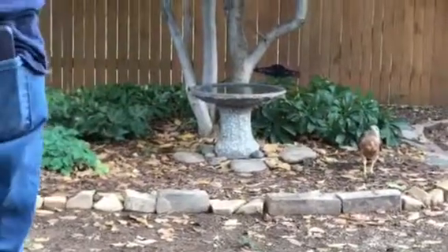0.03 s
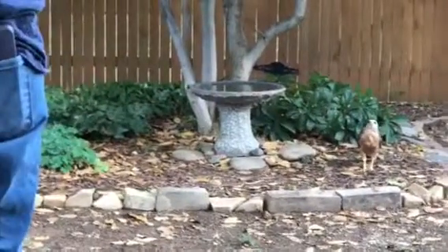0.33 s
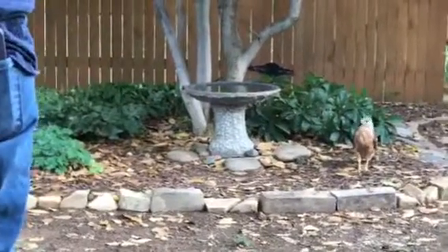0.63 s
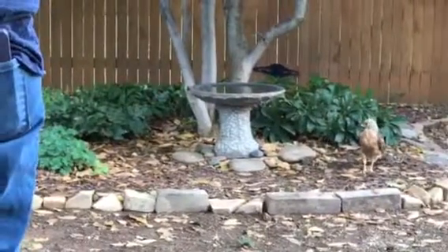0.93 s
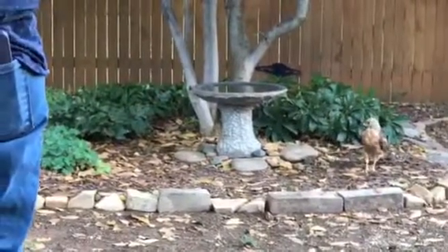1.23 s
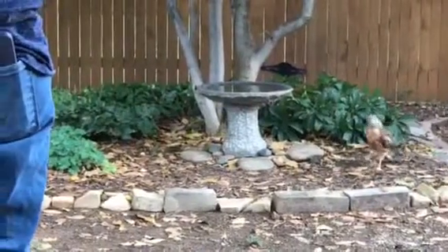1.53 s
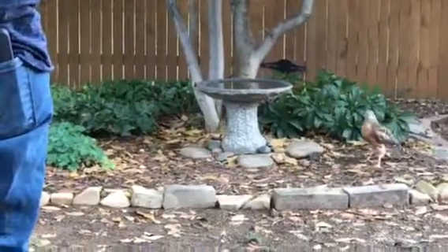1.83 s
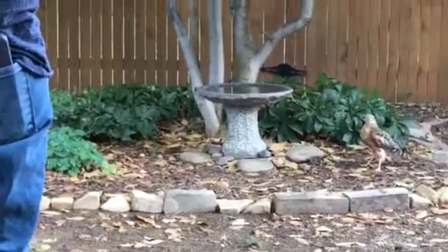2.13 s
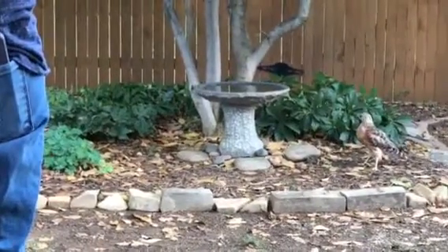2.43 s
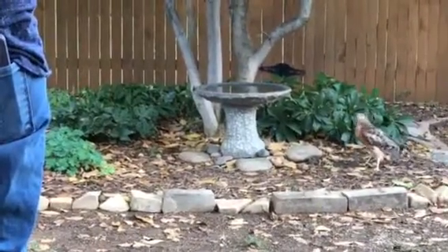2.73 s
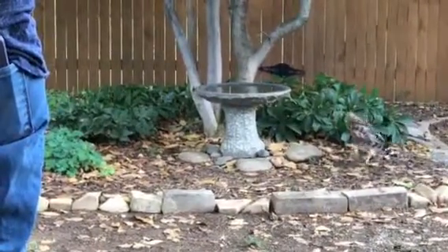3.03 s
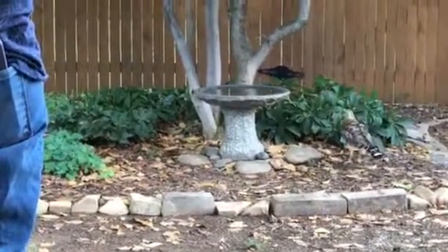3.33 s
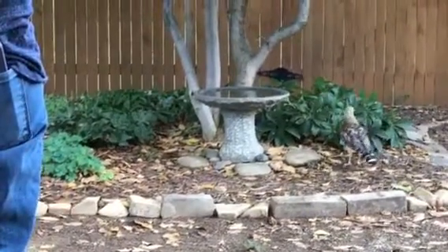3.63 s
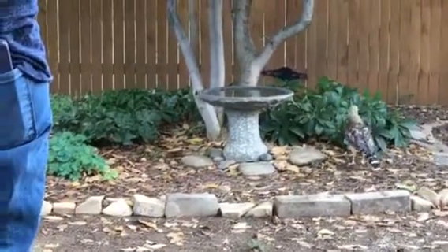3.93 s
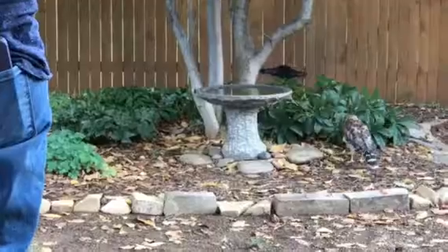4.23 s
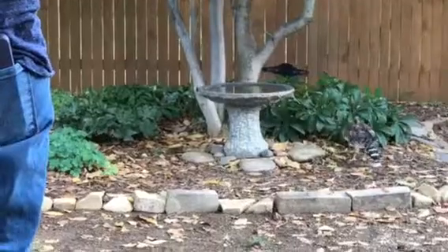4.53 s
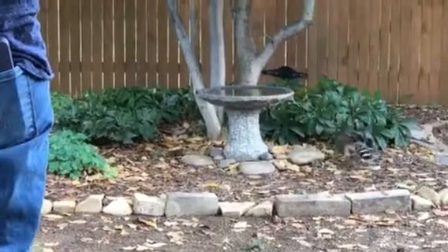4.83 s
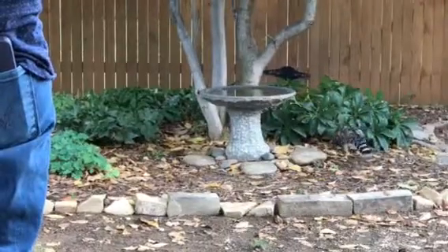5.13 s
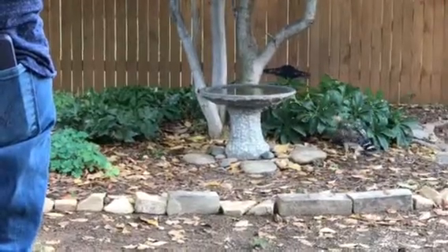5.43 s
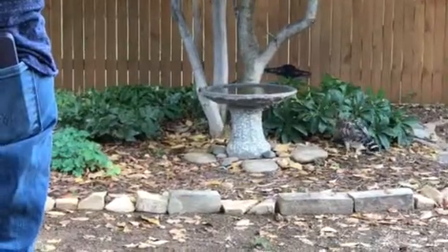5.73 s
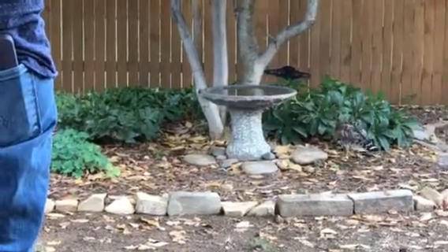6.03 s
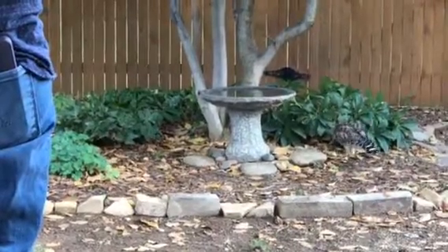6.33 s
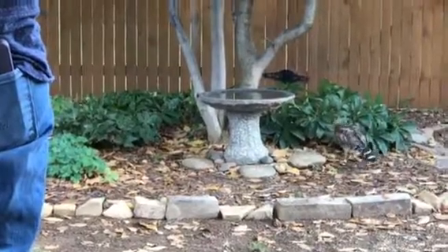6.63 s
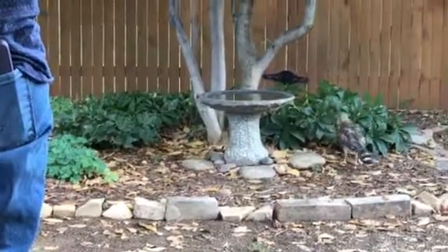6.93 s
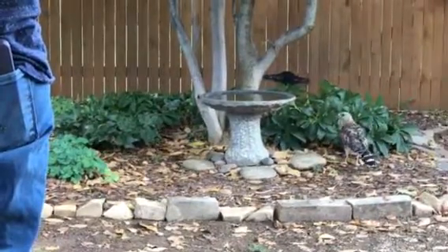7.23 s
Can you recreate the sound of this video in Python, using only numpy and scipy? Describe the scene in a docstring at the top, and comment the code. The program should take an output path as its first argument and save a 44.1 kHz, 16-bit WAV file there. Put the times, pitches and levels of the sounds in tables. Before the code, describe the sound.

A faint, low traffic rumble and a machine hum run throughout in a fenced back yard. A hawk, fairly near, gives a sharp, high chirp at 0.2 seconds, another at 1.7 and a quick pair around 1.9, followed by soft clucks. Dry leaves crackle briefly at 2.7 seconds. Two loud, harsh, nasal screams follow at 2.8 and 3.4 seconds, each about a third of a second long, dropping in pitch and breaking into a chirp. Chirp pairs come at 4.7 and 5.3 seconds. From 5.5 seconds to the end, small metal chimes tinkle faintly, very high. At 6.6 seconds a chirp opens a third, hoarser scream that cracks into squeaky notes. A small distant bird peeps softly now and then, with tiny leaf rustles and two quiet rising whines near 1.4 and 6.1 seconds. The calls carry a short, light echo.

```python
"""A sharp two-voiced chirp cuts through the low traffic rumble and machine hum of a fenced back yard.
More chirps follow, two unrelated notes from the two sides of a bird's syrinx, along with three harsh,
nasal screams whose harmonics ring in the throat until the voice breaks. Soft whines, clucks, far peeps
and dry leaf rustles fall in between; late on, small hanging metal rods knock together and tinkle faintly.
The fence, the house and the trees echo the calls, rustles and tinkles."""
import sys
import numpy as np
from scipy import signal
from scipy.fft import rfft, irfft
from scipy.io import wavfile

SR = 44100
rng = np.random.default_rng(int(sys.argv[2]) if len(sys.argv) > 2 else 0)


def output_pcm(signal):
    """Save a mono or channel-first signal as 16-bit PCM at the path in sys.argv[1].

    Samples are clipped to [-1, 1] before scaling.
    """
    pcm = np.clip(np.atleast_2d(signal).T, -1, 1) * 32767
    wavfile.write(sys.argv[1], SR, np.round(pcm).astype(np.int16))


N = 321048


def undb(db):
    """Decibels to gain."""
    return 10 ** (np.asarray(db) / 20)


def unit(x):
    """Scale to rms 1."""
    return x / np.sqrt(np.mean(x ** 2) + 1e-18)


def at_hz(points, hz):
    """Read (Hz, value) points on a log-frequency axis."""
    freqs, values = np.transpose(points)
    return np.interp(np.log(np.maximum(hz, 1)), np.log(freqs), values)


def colour(x, points):
    """EQ by a curve of (Hz, dB) points."""
    return irfft(rfft(x) * undb(at_hz(points, np.fft.rfftfreq(len(x), 1 / SR))), len(x))


def band(x, lo_hz, hi_hz):
    """Causal band-pass."""
    sos = signal.butter(2, [lo_hz, min(hi_hz, SR / 2 - 100)], "band", fs=SR, output="sos")
    return signal.sosfilt(sos, x)


def wobble(n, rate):
    """Random modulator with `rate` turns a second and a spread near 1."""
    return np.interp(np.arange(n) / SR * rate, np.arange(n), rng.standard_normal(n))


def phase_of(hz):
    """Running phase of a pitch curve."""
    return 2 * np.pi * np.cumsum(hz) / SR


def fade(t, length, rise, fall):
    """Smooth gate from 0 to `length`."""
    return np.sin(np.pi / 2 * np.clip(np.minimum(t / rise, (length - t) / fall), 0, 1)) ** 2


def add(track, start, x):
    """Mix a sound into a track at `start` seconds."""
    i = max(int(start * SR), 0)
    track[i:i + len(x)] += x[:max(N - i, 0)]


# traffic bed before its final EQ: (frequency [Hz], relative level [dB])
TRAFFIC_SPECTRUM = [(15, -25), (25, -26), (55, -4), (84, -4), (123, -0.5), (194, -13), (241, -15),
                    (269, -16), (342, -23), (587, -26.5), (1220, -23.5), (4210, -34), (4950, -37),
                    (6490, -36.5), (15800, -48)]
def traffic(drive_db=-59, drift_db=0.66):
    """Far traffic blends into a steady, bass-heavy bed of noise."""
    bed = colour(rng.standard_normal(N), TRAFFIC_SPECTRUM)
    bed = bed / np.std(band(bed, 300, 15800)) * undb(drive_db)
    bed = colour(bed, [(38, -2.5), (52, -9), (70, -2), (120, -5.5), (200, 1), (450, -0.5),
                       (1000, 0.5), (4000, 0), (12000, -1)])
    return bed * undb(drift_db * wobble(N, 3.02))


# hum partials: (frequency [Hz], level at mid-scene [dB], pitch wander [share])
HUM_PARTIALS = [(54.2, -60, 0.027), (119.7, -55.5, 0.0061), (236.8, -68.5, 0.0059), (349.3, -74, .01)]
def machine_hum(swell_db=2):
    """A machine's low partials waver in level and pitch and slowly grow."""
    hum = np.zeros(N)
    for hz, db, wander in HUM_PARTIALS:
        gain = np.sqrt(2) * undb(db + 1.9 * wobble(N, 16))
        hum += gain * np.sin(phase_of(hz * (1 + wander * wobble(N, 13))))
    return hum * undb(swell_db * np.linspace(-.5, .5, N))


# slaps off the stones, bird bath, fence and house: (delay [s], gain before EQ [dB])
SLAPS = [(.0093, -13), (.0168, -12.5), (.028, -16.5), (.0437, -14)]
# reverb tail: (frequency [Hz], t60 [s])
TAIL_T60 = [(1000, 0.38), (4000, 0.54), (7000, 0.37), (14000, 0.22)]
def yard_echo(x, scatter_db=-6, scatter_s=0.018, predelay_s=.006, tail_db=-12):
    """Walls give a few clear echoes, plants scatter many weak ones; trees and houses leave a tail."""
    t = np.arange(SR) / SR
    scatter = rng.standard_normal(SR) * (rng.random(SR) < .03) * np.exp(-t / scatter_s)
    early = undb(scatter_db) * unit(scatter * (t > predelay_s)) / np.sqrt(SR)
    for delay, db in SLAPS:
        early[int(delay * SR)] += undb(db)
    early = colour(early, [(1000, 3.5), (3500, 4), (7000, 1.0), (14000, -0.5)])
    edges = np.geomspace(500, 16000, num=7)
    tail = np.zeros(SR)
    for lo, hi in zip(edges, edges[1:]):
        t60 = at_hz(TAIL_T60, np.sqrt(lo * hi))
        tail += band(rng.standard_normal(SR), lo, hi) * undb(-60 * t / t60)
    late = undb(tail_db) * unit(tail * np.clip(t / 0.062, 0, 1)) / np.sqrt(SR)
    return signal.fftconvolve(x, early + late)[:N]


def whistle(length, start_hz, end_hz, db, waver):
    """A gliding note, pure or husky by how much it wavers."""
    t = np.arange(int(length * SR)) / SR
    hz = np.linspace(start_hz, end_hz, len(t)) * (1 + waver * wobble(len(t), 911))
    return unit(np.sin(phase_of(hz)) * fade(t, length, length * 0.28, length * 0.36)) * undb(db)


# peep cues: (time [s], level before the mix [dB])
PEEP_CUES = [(.002, -65), (.54, -57.5), (1.206, -58), (2.26, -56), (4.31, -57.5), (4.994, -57),
             (6.407, -59)]
# the notes of each peep: (delay [s], length [s], start pitch [Hz], end pitch [Hz], trim [dB])
PEEP_PAIR = [(0, .076, 3430, 4127, -1), (.076, 0.0628, 3648, 4170, -5)]
def peeps():
    """A small far bird peeps in pairs of husky rising notes."""
    out = np.zeros(N)
    for start, db in PEEP_CUES:
        for delay, length, from_hz, to_hz, trim_db in PEEP_PAIR:
            add(out, start + delay, whistle(length, from_hz, to_hz, db + trim_db, waver=.075))
    return out


def syrinx(hz, rough, shape, jitter=0.039, flutter=0.84, count=19):
    """A bird's vibrating voice and its phase: uneven cycles smear the upper harmonics first."""
    phase = phase_of(hz * (1 + jitter * rough * wobble(len(hz), 900)))
    voice = sum(undb(shape(k * hz)) * (k * hz < SR / 2) * np.sin(k * phase + rng.uniform(0, 2 * np.pi))
                for k in range(1, count + 1))
    return np.sqrt(2) * voice * (1 + flutter * rough * wobble(len(hz), 400)), phase


def soft_call(length, start_hz, end_hz, db, peak_hz, curve, rough):
    """A short glide through one broad throat resonance, driven hardest where its pitch is highest."""
    t = np.arange(int(length * SR)) / SR
    hz = start_hz + (end_hz - start_hz) * (t / length) ** curve
    throat = [(peak_hz / 3, -28), (peak_hz * 0.65, -12), (peak_hz, 0), (peak_hz * 1.3, -14),
              (peak_hz * 3, -27), (peak_hz * 7, -44)]
    voice, _ = syrinx(hz, rough, lambda f: at_hz(throat, f), jitter=0.079, count=12)
    effort = (hz / hz.max()) ** 2
    return unit(voice * effort * fade(t, length, length * 0.13, length * 0.053)) * undb(db)


# whine cues: (time [s], length [s], level before the mix [dB])
WHINE_CUES = [(1.404, 0.052, -48.5), (6.083, .085, -50)]
def whines(first_hz=(760, 1147), second_hz=(1620, 1770), second_db=-1.8, throat_hz=3420):
    """Soft rising whines; a second, higher voice joins halfway through each."""
    out = np.zeros(N)
    for start, length, db in WHINE_CUES:
        add(out, start, soft_call(length, *first_hz, db, throat_hz, curve=.62, rough=0.38))
        second = soft_call(length / 2, *second_hz, db + second_db, throat_hz, curve=0.556, rough=0.26)
        add(out, start + length / 2, second)
    return out


# cluck cues: (time [s], pitch [Hz], level before the mix [dB])
CLUCK_CUES = [(1.086, 1664, -59.5), (1.158, 932, -63), (1.964, 1726, -45), (2.238, 1700, -44.5),
              (2.357, 1875, -54.5), (2.51, 1824, -55.5), (6.265, 1525, -61), (6.395, 1005, -61)]
def clucks(length=.034, upper_db=-5.5):
    """Soft clucks: a lower and an upper voice fall together."""
    out = np.zeros(N)
    for start, hz, db in CLUCK_CUES:
        add(out, start, soft_call(length, hz, hz * 0.75, db, hz, curve=2.72, rough=0.36))
        add(out, start, soft_call(length, hz * 1.78, hz, db + upper_db, hz * 1.3, curve=1.6, rough=0.16))
    return out


# rustle cues: (time [s], level [dB])
RUSTLE_CUES = [(.816, -56), (.862, -62), (2.701, -46.5), (4.97, -57), (6.219, -52.5)]
def leaf_rustles(decay_s=0.0099):
    """Dry leaves stir in quick clusters of crackles."""
    out = np.zeros(N)
    t = np.arange(SR // 5) / SR
    for start, db in RUSTLE_CUES:
        crackle = rng.standard_normal(len(t)) * undb(7.2 * wobble(len(t), 1500))
        add(out, start, unit(band(crackle, 1002, 9400)) * np.exp(-t / decay_s) * undb(db))
    return out


# modes of each rod, by name: (frequency [Hz], trim [dB], t60 [s])
ROD_MODES = {"long": [(7050, -9.5, 1.5), (10660, -6, 0.43), (15000, -1, 0.39)], "middle": [(8500, -13, 1),
             (12400, 8.5, 0.2)], "short": [(9500, -12, 1), (13480, 3, .26)], "twin": [(9220, -9, 0.7),
             (9350, -1, 0.58), (9900, -9, 1)]}
# knocks between the rods: (time [s], rod [name], level [dB])
ROD_KNOCKS = [(5.551, "long", -58), (5.575, "short", -54), (5.701, "long", -60.5), (5.851, "twin", -52.5),
              (6.075, "long", -59.5), (6.87, "twin", -49.5), (6.919, "long", -48.5), (7.032, "short", -51),
              (7.038, "middle", -52), (7.216, "short", -62)]
def rod_tinkles(attack_s=0.0089, beat_hz=19, swing_db=4.5, swings_per_s=16.3):
    """Tiny hanging metal rods ring in high modes, each a beating pair that flutters as the rod swings."""
    out = np.zeros(N)
    t = np.arange(SR) / SR
    for start, rod, db in ROD_KNOCKS:
        for hz, trim_db, t60 in ROD_MODES[rod]:
            split_hz = hz + beat_hz * rng.uniform(0.38, 2.2)
            pair = np.sin(2 * np.pi * hz * t) + 0.74 * np.sin(2 * np.pi * split_hz * t)
            ring = undb(db + trim_db - 60 * t / t60 + swing_db * wobble(SR, swings_per_s))
            add(out, start, pair * ring * (1 - np.exp(-t / attack_s)))
    return out


# breath noise in a chirp: (frequency [Hz], relative level [dB])
CHIRP_BREATH = [(1100, -33), (1600, -8), (2400, -35), (3200, 5.5), (5000, -1), (6400, 1.5), (7200, -4),
                (9500, -9), (10300, -22), (11400, -3), (12200, -4), (13400, -20), (14200, -16),
                (16000, -27)]
# narrow resonance on the high voice's octave: (frequency [Hz], gain [dB])
OCTAVE_RESONANCE = [(13000, -13.5), (13600, -6), (14300, -9)]
# chirp cues: (time [s], hold [s], low voice [Hz], high voice [Hz], low level [dB], high level [dB])
CHIRP_CUES = [(.158, .072, 3986, 6650, -38.5, -39.5), (1.685, 0.068, 4024, 6780, -37.5, -36.5),
              (1.91, 0.063, 4440, 7190, -40.5, -41.5), (1.968, 0.061, 4220, 6720, -42, -49.5),
              (3.037, 0.066, 4100, 6830, -36, -37.5), (3.685, .066, 4020, 6770, -37, -39.5),
              (4.695, 0.07, 3968, 6770, -37.5, -38.5), (4.795, .063, 4450, 7210, -41.5, -47.5),
              (5.299, 0.065, 4185, 6620, -42, -44.5), (5.413, 0.067, 4020, 6860, -36.5, -39.5),
              (6.621, 0.071, 3667, 6506, -40, -37.5)]
def chirp(hold, low_hz, high_hz, low_db, high_db, fall_s=.02, sag=.011, flutter_db=4.5, rasp_db=-8):
    """The two sides of the syrinx flick up, hold two unrelated notes and fall."""
    length = hold + fall_s
    t = np.arange(int(length * SR)) / SR
    n = len(t)
    # both voices start an octave flat
    low_flick = .5 * np.exp(-(t / .02) ** 2.62)
    high_flick = .5 * np.exp(-(t / .017) ** 2.6)
    held = np.minimum(t / hold, 1)
    fall = np.clip((t - hold) / fall_s, 0, 1)
    # the membranes rattle while they glide and lock while they hold
    loose = np.clip(2 * low_flick + 4 * fall, 0, 1)
    locked = (1 - loose) ** 4
    shake = 0.014 + 0.05 * loose + 0.048 * low_flick
    drift = .009 * wobble(n, 70) - sag * (held - .6)
    low_glide = low_hz * (1 - low_flick) * (1 - .56 * fall ** .8)
    high_glide = high_hz * (1 - high_flick) * (1 - 1.1 * fall)
    low = phase_of(low_glide * (1 + drift + shake * wobble(n, 1700)))
    high = phase_of(high_glide * (1 + drift / 2 + 0.74 * shake * wobble(n, 1238)))
    # the low voice comes in weak and swells as it lets go; the high one stops first
    low_db = low_db - 5 * (1 - held) ** 2
    low_gain = undb(low_db + np.interp(fall, [0, .15, 1], [0, 6, -8.5]) + flutter_db * wobble(n, 219.9))
    high_gain = undb(high_db - 43 * fall + flutter_db * wobble(n, 170))
    low_voice = np.sin(low) + locked * (undb(-17) * np.sin(2 * low) + undb(-21) * np.sin(3 * low))
    high_voice = np.sin(high) + locked * undb(at_hz(OCTAVE_RESONANCE, 2 * high_hz)) * np.sin(2 * high)
    # coupling between the sides adds difference and sum tones
    coupled = locked * (undb(-19.5) * np.sin(high - low) + undb(-21) * np.sin(high + low))
    tones = low_gain * low_voice + high_gain * high_voice + np.sqrt(low_gain * high_gain) * coupled
    breath = unit(colour(rng.standard_normal(n), CHIRP_BREATH))
    rasp = undb(rasp_db) * (low_gain + high_gain) / 2 * breath
    # a low rasp leads in before the notes speak
    lead = undb(low_db - 5) * np.sin(low) * 2 * low_flick
    tone_gate = fade(t, length, rise=.02, fall=0.0016)
    rasp_gate = fade(t, length, rise=0.0026, fall=.002)
    return np.sqrt(2) * tones * tone_gate + (lead + rasp) * rasp_gate


# voice cracks: (time [s], start pitch [Hz], end pitch [Hz], level [dB])
CRACK_CUES = [(3.072, 3144, 3038, -37), (6.67, 3636, 4400, -34), (6.713, 3190, 2854, -40.5),
              (6.772, 5140, 5020, -41), (6.858, 3040, 2893, -42)]
def voice_cracks(length=0.0398):
    """Brief side notes sound where a scream cracks."""
    out = np.zeros(N)
    for start, from_hz, to_hz, db in CRACK_CUES:
        add(out, start, whistle(length, from_hz, to_hz, db, waver=0.04))
    return out


# throat EQ on a scream's harmonics: (frequency [Hz], gain [dB])
THROAT_EQ = [(850, -45), (1700, -21.5), (2200, -21), (2700, -21.5), (3200, -3), (3600, 0), (4300, -21),
             (5300, -18), (6200, -19.5), (7100, -13.5), (8000, -22), (9000, -13), (10300, -29.5),
             (13400, -21.5), (15500, -33)]
# breath noise in a scream: (frequency [Hz], relative level [dB])
SCREAM_BREATH = [(1000, -39), (2400, 3), (3200, 2), (4500, 8.5), (7000, 4.5), (10500, -14), (13000, -3),
                 (16000, -21)]
# brief dips in a scream's main note: small pitch bends, and one level drop where an echo cancels it:
# (time [s], half width [s], level change [dB], pitch change [share])
NOTE_DIPS = [(2.884, 0.021, 0, -0.026), (3.509, 0.019, -11.5, 0.001), (6.786, 0.0197, -0.5, -.02)]
# scream cues: (time [s], length [s], time to top [s], time to break [s], top pitch [Hz], sag [Hz/s],
# pitch after break [Hz], level [dB], fade [dB/s], overtones [dB], tilt [dB/octave], hoarseness [0-1])
SCREAM_CUES = [(2.753, 0.38, .085, 0.27, 892.5, 180, 770, -29.5, -25.5, 0.5, -3, 0.22),
               (3.38, 0.37, .1, .245, 913.3, 490, 784.4, -30, -6, -4.5, 1, .15),
               (6.636, 0.3, 0.0297, .205, 909.3, 379.7, 752.6, -29.5, -30, 5, -6.5, 0.49)]
def scream(start, length, top_s, break_s, top_hz, sag, end_hz, level_db, fade_db, overtone_db, tilt_db,
           hoarse, scoop=.15, swell_db=6.5, break_db=-4.5, dull_db=-4.5, rasp_db=-3, edge_hz=4000):
    """A nasal cry, its fourth harmonic on the throat's resonance: it scoops up, sags and breaks."""
    t = np.arange(int(length * SR)) / SR
    n = len(t)
    onset = np.clip(1 - t / 0.029, 0, 1)
    tiring_s = np.clip(t, top_s, break_s) - top_s
    # at the break the pitch drops and the voice turns hoarse, weaker and duller
    broken = np.clip((t - break_s) / .035, 0, 1)
    hz = top_hz * (1 - scoop * np.clip(1 - t / top_s, 0, 1) ** 2) - sag * tiring_s
    kinks = 1 + 0.00507 * wobble(n, 38)
    hz = (hz + (end_hz - hz) * broken) * kinks
    strain = hoarse * np.minimum(t / break_s, 1) ** 1.2
    rough = np.clip(0.84 * onset + strain + (0.64 - strain) * broken, 0, 1)
    dip_db = 0
    for when, width, change_db, bend in NOTE_DIPS:
        dip = np.exp(-((t + start - when) / width) ** 4)
        dip_db = dip_db + change_db * dip
        hz = hz * (1 + bend * dip)
    effort_db = fade_db * tiring_s - swell_db * onset
    db = level_db + effort_db + break_db * broken + dip_db
    # the overtones resist part of the swell and fade, and hold their level through a dip
    bright_db = overtone_db - 0.31 * effort_db + dull_db * broken - dip_db
    # the gape of the beak lifts and tilts all overtones above the resonance
    shape = lambda f: at_hz(THROAT_EQ, f) + (bright_db + tilt_db * np.log2(f / edge_hz)) * (f > edge_hz)
    voice, phase = syrinx(hz * (1 + 0.0049 * wobble(n, 122.2)), rough, shape)
    # under strain strong and weak cycles alternate, filling the gaps between harmonics
    voice *= 1 + 1.2 * rough * wobble(n, 70) * np.cos(phase / 2)
    # air rushes through once a cycle
    rasp = colour(rng.standard_normal(n) * (1 + 2 * np.cos(phase)), SCREAM_BREATH)
    cry = voice * (1 - rough / 2) + undb(rasp_db) * rough ** 1.02 * unit(rasp)
    return cry * undb(db) * fade(t, length, rise=0.0045, fall=0.046)


def scene(far_direct_db=-4, far_send_db=2):
    """Mono mix over the bed: far birds get less direct sound and more echo than the near sources."""
    far = whines() + clucks() + peeps()
    near = np.zeros(N)
    for start, *cue in SCREAM_CUES:
        add(near, start, scream(start, *cue))
    near += voice_cracks()
    for start, *cue in CHIRP_CUES:
        add(near, start, chirp(*cue))
    near += rod_tinkles() + leaf_rustles()
    echo = yard_echo(near + undb(far_send_db) * far)
    return (near + undb(far_direct_db) * far + echo + traffic() + machine_hum())[None]


def record(dry, cutoff_hz=15850):
    """A steep low-pass cuts the top of the treble."""
    return signal.sosfilt(signal.ellip(10, .2, 70, cutoff_hz, fs=SR, output="sos"), dry)


dry = scene()
out = record(dry)
output_pcm(out)
```